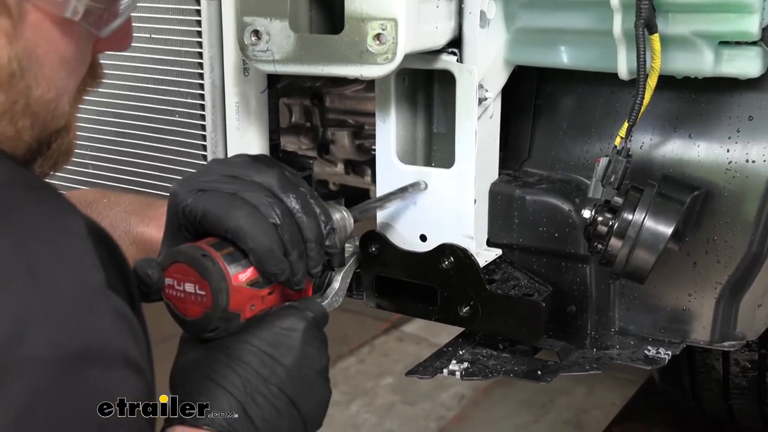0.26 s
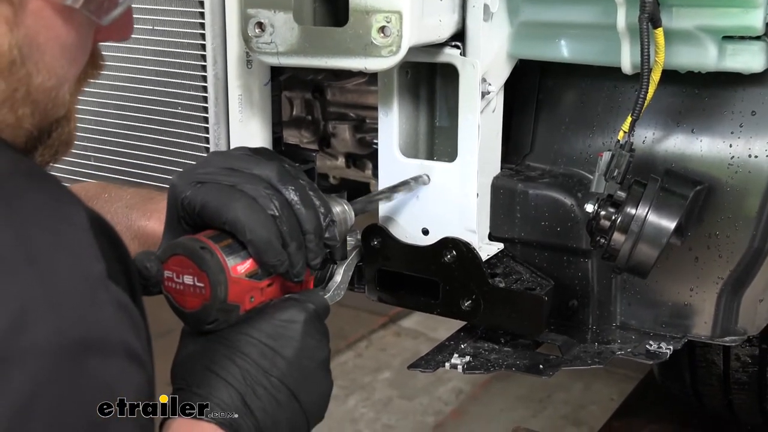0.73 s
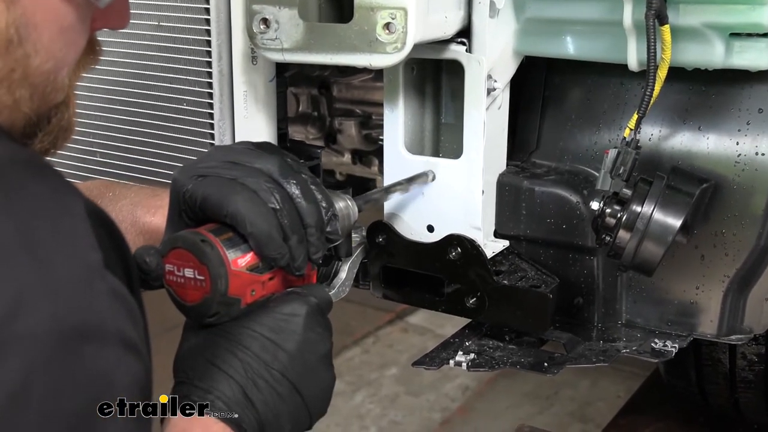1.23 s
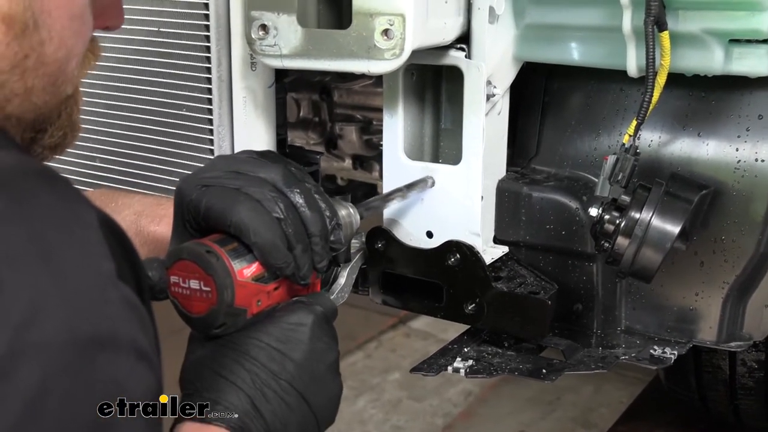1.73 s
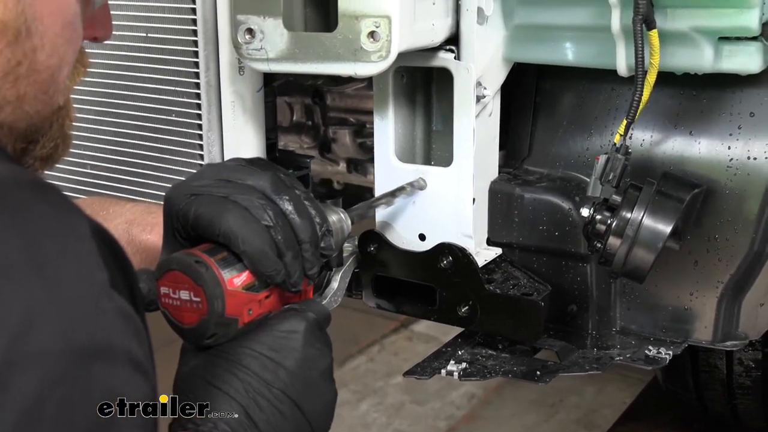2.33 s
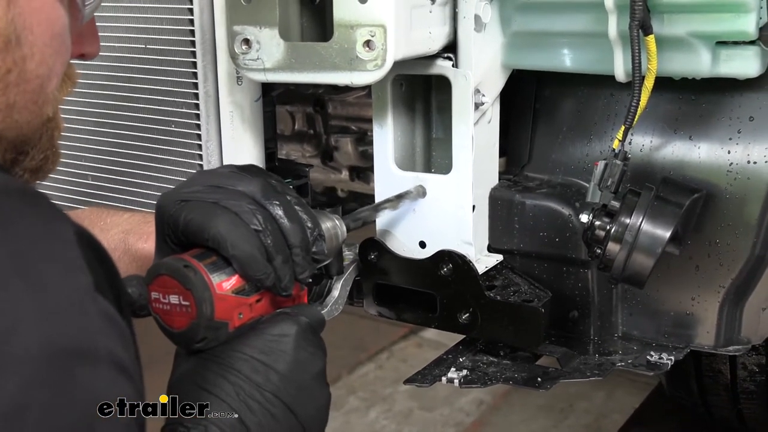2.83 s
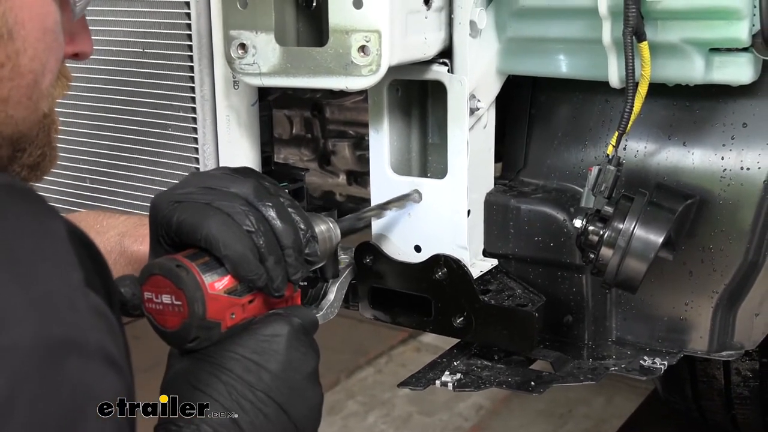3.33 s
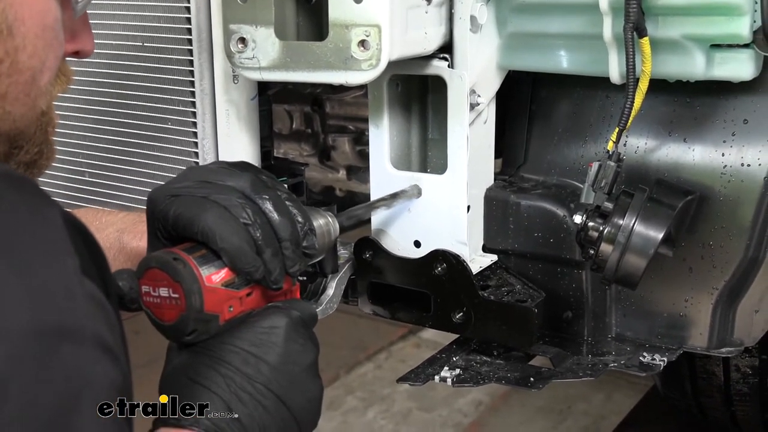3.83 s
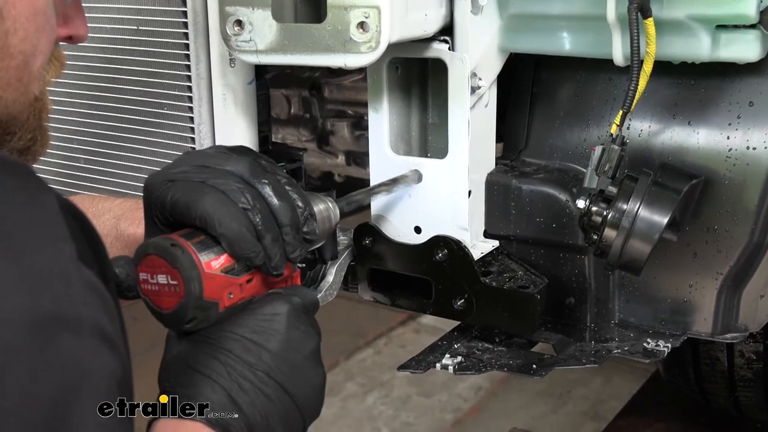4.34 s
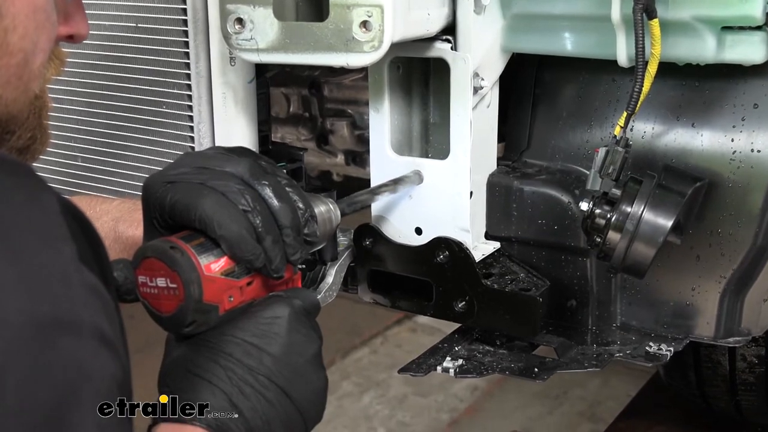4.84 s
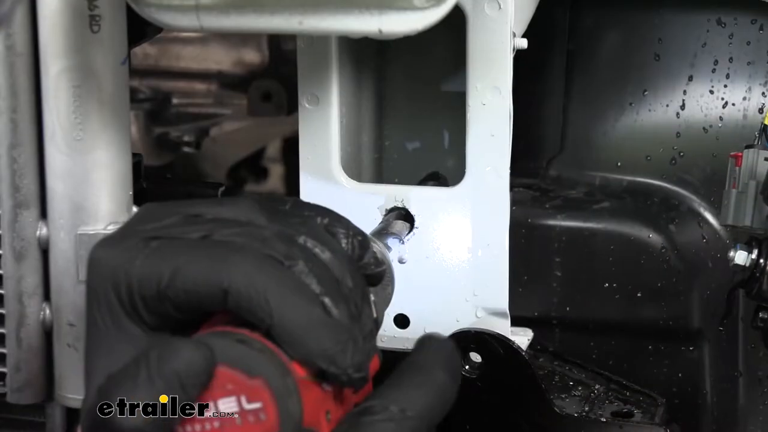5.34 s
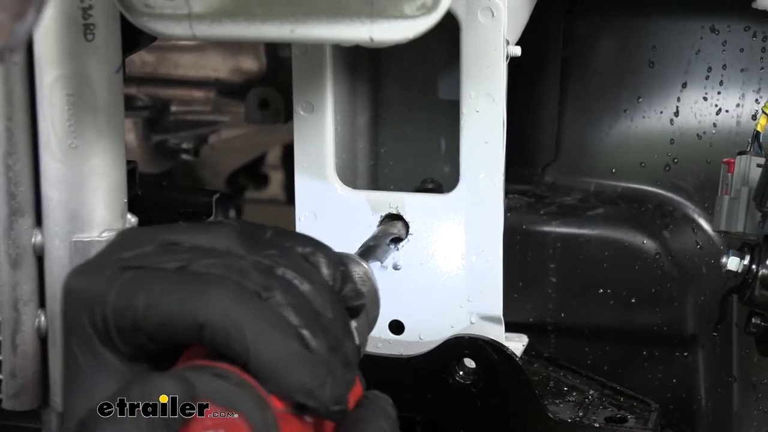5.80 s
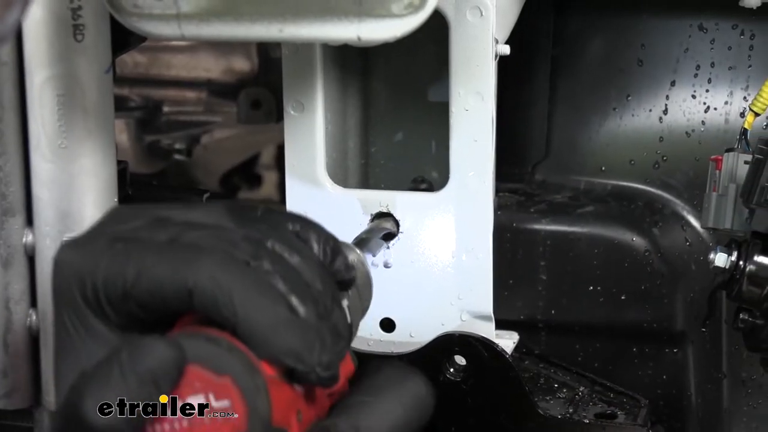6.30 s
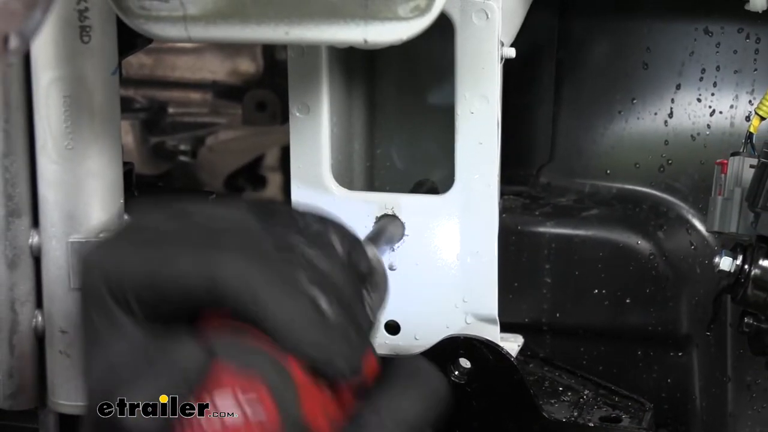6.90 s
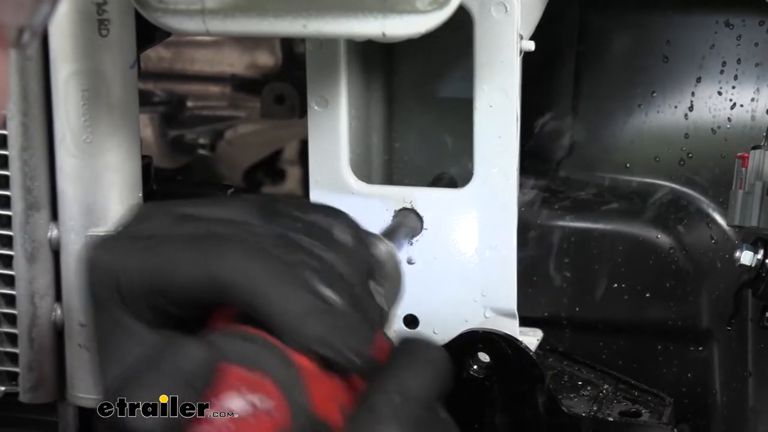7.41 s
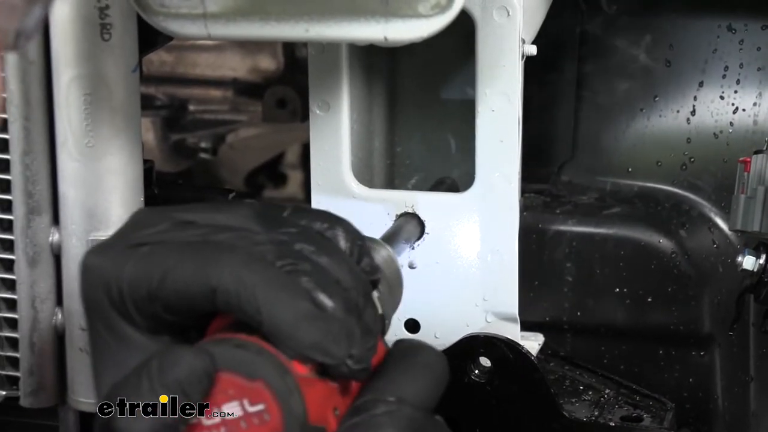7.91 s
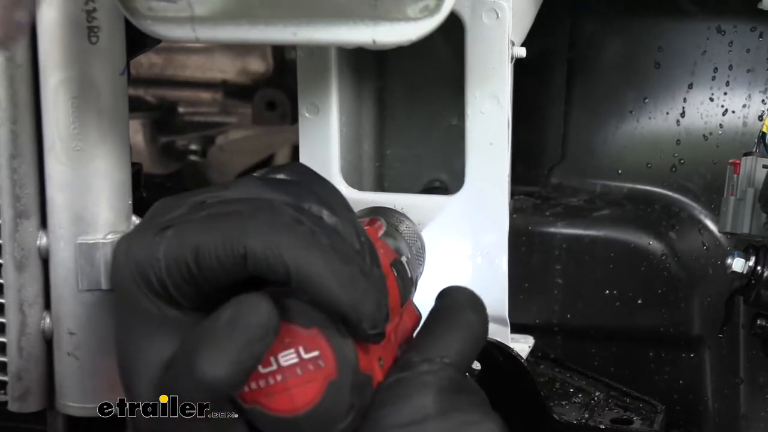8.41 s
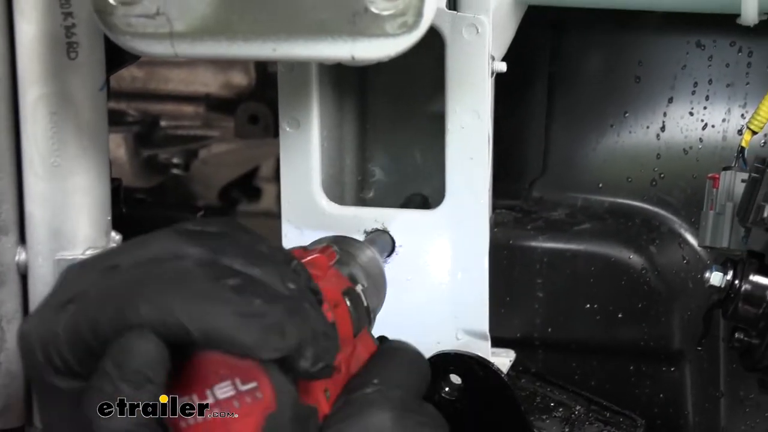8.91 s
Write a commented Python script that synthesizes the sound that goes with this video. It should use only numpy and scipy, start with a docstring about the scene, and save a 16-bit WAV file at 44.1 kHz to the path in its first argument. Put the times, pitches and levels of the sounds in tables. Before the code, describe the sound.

A cordless drill bores through steel in one long buzzing run, then scrapes and knocks in the hole in short bursts.

```python
"""A workshop, where a cordless drill bores into a steel car frame: one blip of the trigger, then a long
loaded run that speeds up as the tip breaks through. In short bursts the flutes then snag and scrape in
the open hole and ring the sheet steel. Gears buzz, the speed controller whistles, and the bit knocks
against the rim between bursts. Ventilation rumbles underneath."""
import sys
import numpy as np
from scipy import signal
from scipy.fft import rfft, irfft
from scipy.io import wavfile
from scipy.ndimage import uniform_filter1d, map_coordinates

SR = 44100
rng = np.random.default_rng(int(sys.argv[2]) if len(sys.argv) > 2 else 0)


def materialize(psi):
    """Save the field psi as 16-bit PCM at rate SR to the path in sys.argv[1].

    A 1-D psi becomes a single channel; in a 2-D psi each row is a channel.
    """
    bounded = np.clip(np.atleast_2d(psi).T, -1, 1)
    quanta = np.round(bounded * 32767).astype(np.int16)
    wavfile.write(sys.argv[1], SR, quanta)


N = 403515
T = np.arange(N) / SR
GEAR_RATIO = 19.4  # motor turns per turn of the bit
SPIN_CURVE = 1.6  # the motor starts softly, then shoots up

# trigger pulls, bit cutting: start/s, spin-up/s, hold/s, coast/s, whistle lead/s, whistle/dB, level/dB
CUTTING_PULLS = [(0.262, .072, .14, .125, 0.014, -36.5, -14), (0.7, .056, 4.52, 0.2, 0.012, -39.5, -19)]
# trigger pulls, bit loose in the hole:
# start/s, spin-up/s, hold/s, coast/s, whistle lead/s, whistle/dB, flute blows/dB, scraping/dB
LOOSE_PULLS = [(5.521, 0.045, 0.1, 0.041, 0.011, -39, -16.5, -22),
               (6.779, 0.085, .082, 0.43, 0.005, -35, -14.5, -14.5),
               (7.481, .046, 0.107, 0.034, 0.15, -44, -17.5, -17.5),
               (7.847, .064, 0.139, 0.074, 0.018, -45, -17, -19.5),
               (8.072, 0.061, 0.04, 0.012, 0.053, -60, -30, -22.5),
               (8.816, 0.05, 0.15, 0.13, 0.0075, -47, -27.5, -19.5)]


def undb(db):
    return 10 ** (np.asarray(db) / 20)


def unit(x):
    """Scale to rms 1."""
    return x / np.sqrt(np.mean(x ** 2))


def noise():
    return rng.standard_normal(N)


def walk(rate):
    """Smooth random drift of rms 1, with `rate` changes a second."""
    k = max(int(SR / rate), 2)
    return unit(uniform_filter1d(np.repeat(rng.standard_normal(N // k + 1), k), k)[:N])


def colour(x, points):
    """Minimum-phase EQ through points of f/Hz, gain/dB."""
    hz, db = np.transpose(points)
    f = np.fft.rfftfreq(4096, 1 / SR)
    cepstrum = irfft(np.log(undb(np.interp(np.log(f + 1), np.log(hz), db))))
    cepstrum[1:len(f)] *= 2
    cepstrum[len(f):] = 0
    return signal.fftconvolve(x, irfft(np.exp(rfft(cepstrum))))[:N]


def band(x, hz, width):
    """One resonance, gain 1 at its centre."""
    return signal.lfilter(*signal.iirpeak(min(hz, SR / 2 - 1), hz / width, SR), x)


def split(x, hz):
    """Crossover: lows and highs."""
    return [signal.sosfilt(signal.butter(4, hz, kind, fs=SR, output="sos"), x) for kind in ("low", "high")]


def impacts(rate, spread_db):
    """Crackle of tiny, very unequal impacts, about `rate` a second."""
    size = undb(spread_db * np.minimum(rng.exponential(size=N), 4))
    return unit((rng.random(N) < rate / SR) * size * rng.choice([-1, 1], N))


def strokes(rows, rise_s, decay_s):
    """Short noise bursts from rows of t/s, level/dB."""
    out, t = np.zeros(N), T[:SR // 10]
    envelope = (1 - np.exp(-t / rise_s)) * np.exp(-t / decay_s)
    for s, db in rows:
        i = int(s * SR)
        out[i:i + len(t)] += undb(db) * envelope * rng.standard_normal(len(t))
    return out


def swell(peak_s, half_s):
    """Bell-shaped envelope."""
    return np.exp(-((T - peak_s) / half_s) ** 2)


def cycles(hz):
    """Phase of a moving frequency, radians."""
    return 2 * np.pi * np.cumsum(hz) / SR


def ventilation():
    """A steady rumble, with a hum and a faint hiss that fade as the long run starts."""
    rumble_eq = [(22, -13.5), (110, -3.5), (164, -8), (722, -18), (2700, -31), (15500, -38.5)]  # air rumble: f/Hz, gain/dB
    early = np.interp(T, [.7, 1.0], [1, 0])
    hum = undb(-46.5) * unit(band(noise(), 155, 8))
    air = band(noise(), 1800, 270) + band(noise(), 590, 840)
    hiss = undb(-45) * unit(split(air, 4500)[0])
    return undb(-46.5) * unit(colour(noise(), rumble_eq)) + early * (hum + hiss)


def workshop(x, t60_low, t60_high, wet_db):
    """The room adds a diffuse tail; lows and highs each have their own decay."""
    t = T[:2 * SR]
    low, high = split(rng.standard_normal(len(t)), 4030)
    tail = low * undb(-60 * t / t60_low) + undb(-2) * high * undb(-60 * t / t60_high)
    tail *= 1 - np.exp(-t / .0028)
    return x + undb(wet_db) * signal.fftconvolve(x, tail / np.linalg.norm(tail))[:N]


def breakthrough(start_s=3.72, end_s=3.8):
    """0 while the lips cut under full load, 1 once the tip is through."""
    return np.interp(T, [start_s, end_s], [0, 1])


def throttle(start, rise, hold, coast, curve=1):
    """Share of full speed in one trigger pull: spin-up, hold, coast to rest."""
    slowing = np.clip(1 - (T - start - rise - hold) / coast, 0, 1) ** 1.3  # friction: fastest at first
    return np.clip((T - start) / rise, 0, 1) ** curve * slowing


def motor_speed(loose_hz=410):
    """Turns per second: set by the load while cutting, free in the open hole."""
    load_curve = [(.34, 508), (.36, 480), (.465, 485), (.75, 310), (.79, 370), (.82, 356), (.855, 386),
                  (.925, 328), (1.09, 338), (1.45, 324), (1.9, 303), (2.75, 301), (3.47, 290), (3.72, 270),
                  (3.8, 415), (3.85, 429), (3.93, 397), (4.75, 383)]  # what the cut allows: t/s, motor speed/Hz
    cutting = np.max([throttle(*row[:4], SPIN_CURVE) for row in CUTTING_PULLS], axis=0)
    loose = np.max([throttle(*row[:4], SPIN_CURVE) for row in LOOSE_PULLS], axis=0)
    allowed = np.interp(T, *np.transpose(load_curve))
    hunting = .013 * (1 - breakthrough() / 2) * walk(22)  # the uneven chip makes the speed waver
    return cutting * allowed * (1 + hunting) + loose * loose_hz


def spin_up(speed):
    """How hard the motor accelerates, 0-1."""
    return np.clip(uniform_filter1d(np.gradient(speed) * SR, SR // 100) / 3500, 0, 1)


def resonate(x, modes):
    """Resonances whose pitch wanders under full load and steadies once the tip is through."""
    ring = sum(undb(db) * band(band(x, hz, width), hz, width) for hz, width, db in modes)
    drift_s = .0004 * (1 - .75 * breakthrough()) * walk(35)
    return unit(map_coordinates(ring, [(T + drift_s) * SR]))


def controller(speed, switch_hz=9901):
    """The switching whistle, with side tones twice the motor speed above and below it."""
    spans = [(s - lead, s + rise + hold, db) for s, rise, hold, _, lead, db, _ in CUTTING_PULLS]
    # unloaded, it stops switching at full speed
    spans += [(s - lead, s + rise, db) for s, rise, _, _, lead, db, *_ in LOOSE_PULLS]
    gate = sum(undb(db) * ((T > on) & (T < off)) for on, off, db in spans)
    level = uniform_filter1d(gate * undb(1.5 * walk(40) - 4 * breakthrough()), SR // 100)
    carrier = 2 * np.pi * switch_hz * T + .2 * walk(150)
    poles = cycles(2 * speed)
    sides = undb(-3) * np.sin(carrier + poles) + undb(-7) * np.sin(carrier - poles)
    current = np.minimum(speed / 250, 1) * (1 - breakthrough() / 2)
    return np.sqrt(2) * level * (np.sin(carrier) + current * sides)


def sheet_steel(force):
    """The car frame rings on after each push; every mode is a cluster of close, beating partials."""
    modes = [(928, 3.5, 0.2), (1071, 8, 0.17), (1180, 1, 0.16), (1290, -1.5, 0.51), (1419, 8.5, 0.056),
             (1510, -2, 0.12), (1790, 3, 0.23), (2185, 7.5, 0.25)]  # modes of the frame: f/Hz, level/dB, t60/s
    t, ring = T[:SR], 0
    for hz, db, t60 in modes:
        detune, angle = rng.standard_normal((2, 10, 1))
        partials = np.sin(2 * np.pi * (hz * (1 + .03 * detune) * t + angle))
        ring = ring + undb(db - 60 * t / t60) * partials.sum(axis=0)
    return signal.fftconvolve(force, ring / np.linalg.norm(ring))[:N]


def squeaks():
    """A land of the bit sticks and slips on the rim in brief, unsteady tones."""
    slips = [(6.238, .004, 1650, -30), (7.177, .005, 1705, -10.5), (8.894, .008, 1870, -14)]  # stick-slip tones: t/s, half length/s, f/Hz, level/dB
    return sum(undb(db) * swell(s, half) * np.sqrt(2) * np.sin(cycles(hz * (1 + .0314 * walk(500))))
               for s, half, hz, db in slips)


def rocking():
    """The tilted bit drags on the rim and makes the sheet groan."""
    drags = [(5.645, 0.027, -17.5), (5.7, 0.03, -23.5), (5.99, 0.036, -50), (6.395, 0.013, -47),
             (6.67, 0.015, -20.5), (6.811, 0.0093, -17.5), (6.95, 0.03, -18.5), (8.24, 0.019, -34),
             (8.754, 0.03, -34), (8.94, 0.043, -17.5)]  # drags on the rim: t/s, half length/s, level/dB
    pressure = sum(undb(db) * swell(s, half) for s, half, db in drags)
    rub = band(band(impacts(900, 2.2) * pressure, 1150, 860), 1170, 1450)
    return undb(12) * rub + sheet_steel(rub)


def knocks():
    """The bit hits the rim: a low thud, a dull body that rings the sheet, and a bright edge."""
    hits = [(5.48, -25, -13, -39), (6.234, -25, -15, -38), (6.63, -19, -4, -34), (6.701, -14, -4, -25),
            (6.796, -13, -11, -22), (6.857, -2, 3, -18), (6.995, -5, -6, -4.5), (7.08, -6, -3, -11),
            (7.539, -5, -1, -6.5), (7.955, -3, 2, -16), (8.275, -14, -1.5, -23), (8.721, -40, -19, -46),
            (8.759, -11, 3, -17.5), (8.823, -20, -17, -27), (8.887, -2, 6.5, -30)]  # knocks on the rim: t/s, thud/dB, body/dB, edge/dB
    chatter = [(8.913 + k * .0161, 2) for k in range(5)]  # the flutes hop round the rim: t/s, level/dB
    thud = strokes([(s, db) for s, db, _, _ in hits], .00096, .0053)
    body = strokes([(s, db) for s, _, db, _ in hits] + chatter, .0017, .003)
    edge = strokes([(s, db) for s, _, _, db in hits], .0012, .0066)
    low = split(thud, 630)[0]
    dull = band(band(body, 1630, 1500), 970, 1900)
    bright = band(edge, 4200, 1900)
    return undb(5.5) * low + undb(4) * dull + undb(-20) * sheet_steel(dull) + undb(8) * bright


def chips():
    """Swarf snaps off with a dry tick."""
    snaps = [(0.1645, -41), (5.468, -19), (5.6655, -13.5), (5.7488, -28), (5.989, -45), (6.086, -39),
             (6.498, -45.5), (6.512, -36), (6.943, -13), (6.9947, -7), (7.016, -14), (7.0309, -10),
             (7.081, -7), (7.113, -12.5)]  # snapping swarf: t/s, level/dB
    return undb(5) * band(strokes(snaps, rise_s=.00046, decay_s=.0015), 8500, 9750)


def reaming():
    """Flutes hail on the rim, lands scrape, swarf rattles; a binding screech is returned separately."""
    scrape_eq = [(30, -20.5), (162, -9), (317, -9.5), (606, 0.5), (778, -6.5), (1410, -1.5), (1960, -6.5),
                 (3500, -6), (6500, -12.5), (9000, -21.5), (15500, -22.5)]  # steel on steel: f/Hz, gain/dB
    bit_modes = [(3860, 2000, 9), (14500, 1700, -2)]  # ring of the binding bit: f/Hz, width/Hz, level/dB
    flute_modes = [(4820, 200, 1), (5720, 230, -0.5), (10800, 540, -10), (14000, 1500, -16)]  # ring of the flutes and their swarf: f/Hz, width/Hz, level/dB
    blow_gain = scrape_gain = 0
    for start, rise, hold, coast, _, _, blows_db, scrape_db in LOOSE_PULLS:
        drive = throttle(start, rise, hold, coast, SPIN_CURVE) ** .8  # loudness follows the motor
        blow_gain += undb(blows_db) * drive
        scrape_gain += undb(scrape_db) * drive
    hail = impacts(1400, 2.6) * undb(2.8 * walk(160))
    blows = unit(split(colour(hail, scrape_eq), 1600)[0])
    grit = impacts(6000, 2.5) * undb(2 * walk(220))
    scrape = unit(split(colour(grit, scrape_eq), 1300)[1])
    screech = undb(5.5) * resonate(grit, bit_modes) * swell(peak_s=5.61, half_s=.14)  # binds once
    rattle = undb(-9) * resonate(impacts(500, 4), flute_modes)
    contact = blows * blow_gain + (scrape + rattle) * scrape_gain
    return undb(-2.5) * contact + undb(-21) * sheet_steel(contact), screech * scrape_gain


def whirr(speed):
    """The gear train buzzes as the motor takes it up to speed."""
    buzz = band(band(impacts(2000, 2.2), 3430, 900), 3800, 5000)
    return undb(-29.5) * unit(buzz) * spin_up(speed)


def revs(sweep_s=.04, smear=.02):
    """The gear whine sweeps up as the motor races, and breaks off when the flutes catch."""
    # motor surges: top/s, top speed/Hz, catch/s, tone at 8 x speed/dB, tone at 16 x speed/dB
    surges = [(.34, 505, .35, -13, -22), (5.598, 530, 5.596, -20, -38), (6.892, 435, 6.897, -19, -34),
              (7.545, 330, 7.536, -28, -18), (7.916, 452, 7.926, -19, -36), (8.112, 488, 8.114, -25, -42),
              (8.9, 440, 8.889, -19, -26)]
    out = 0
    for top_s, top_speed, catch_s, low_db, high_db in surges:
        share = np.exp(-np.minimum(((T - top_s) / sweep_s) ** 2, 20))
        shaft = cycles(top_speed * share * (1 + smear * walk(500)))
        whine = undb(low_db) * np.sin(8 * shaft) + undb(high_db) * np.sin(16 * shaft)
        running = np.clip((catch_s - T) / .004 + .5, 0, 1)
        out += share ** 2.5 * running * whine
    return np.sqrt(2) * out


def catches(attack_s=.0025, smear=.06):
    """The cutting lip catches: a rough squeal that swells and dies within milliseconds."""
    squeals = [(.944, -9, 3630), (2.262, -11, 3150), (2.3263, -8, 3460), (2.855, -13, 3300),
               (3.5206, -8.5, 3380), (3.9298, -8.5, 3460), (4.331, -8, 3660), (4.5084, -8, 3420),
               (4.709, -9, 3690), (4.8396, -9, 3710), (5.017, -8, 3490)]  # catches of the lip: t/s, level/dB, f/Hz
    out = 0
    for s, db, hz in squeals:
        age = np.clip((T - s) / attack_s, 0, 20)
        tone = np.sin(cycles(hz * (1 + smear * walk(900))))
        out += undb(db - 3.5) * age * np.exp(1 - age) * tone
    return out


def gears(speed):
    """Meshing teeth sing, smeared by backlash; they stand out when the motor races or sags."""
    # gear tones: multiple of motor speed, loaded/dB, light load/dB, racing/dB
    mesh = [(4, -15, -18, -17), (8, -15.5, -14, -7), (13.75, -17, -18.5, -26), (16, -15.5, -16, -9.5),
            (28, -22, -34, -34)]
    free = breakthrough()
    racing = np.interp(speed, [430, 470], [0, 1])
    backlash = (.012 + .003 * free) * (1 - racing / 2)
    wobble = .016 * (1 - free) * np.sin(cycles(speed / GEAR_RATIO))  # the lips brake once per bit turn
    shaft = cycles(speed * (1 + wobble + .006 * walk(60) + backlash * walk(600)))
    strain_db = (1 - free) * np.interp(speed, [120, 270, 300, 355, 385, 470], [-13, 4, -1, -3, 7, 0])
    rising_db = spin_up(speed) * (15 * np.sqrt(free) - 7)  # soft from rest, loud as the load lets go
    tones = 0
    for multiple, loaded_db, light_db, racing_db in mesh:
        db = (loaded_db + free * (light_db - loaded_db)) * (1 - racing) + racing * racing_db
        flicker = undb(3 * walk(200) + 2 * walk(25))
        tones += undb(db) * unit(np.sin(multiple * shaft) * flicker)
    return undb(strain_db + rising_db) * tones


def shudder(speed):
    """The bit shudders at low harmonics of the spindle."""
    harmonics = [(3, -25, -27), (7, -28, -23.5), (11, -30, -27)]  # shudder tones: multiple of spindle speed, loaded/dB, light load/dB
    free, spindle = breakthrough(), cycles(speed / GEAR_RATIO)
    tones = 0
    for multiple, loaded_db, light_db in harmonics:
        phase = multiple * spindle + .35 * walk(8) + rng.uniform(0, 2 * np.pi)
        tones += undb(loaded_db + free * (light_db - loaded_db)) * unit(np.sin(phase))
    return tones * np.minimum(speed / 300, 1)


def feed(bite_db=5.5, bite_s=.2, ease_db_per_s=.16):
    """Force of the cut: it follows the trigger, bites hard at the start of each pull and slowly eases."""
    force = 0
    for start, rise, hold, coast, _, _, db in CUTTING_PULLS:
        age = np.maximum(T - start, 0)
        push = undb(db + bite_db * np.exp(-age / bite_s) - ease_db_per_s * age)
        force += push * throttle(start, rise, hold, coast) ** .95
    return force


def boring(speed):
    """The lips tear chips in time with the spindle; as the load eases, the gearbox rattle comes up."""
    cut_eq = [(35, -13), (60, -11.5), (135, -3.5), (359, -5), (585, -2), (1380, -3), (1550, 4),
              (1960, -7.5), (2650, -9), (3700, -1.5), (5450, -8.5), (10200, -12), (13000, -19),
              (15500, -22)]  # tearing steel: f/Hz, gain/dB
    housing_modes = [(1580, 125, 2), (3203, 310, 5.5), (3646, 205, 8.5), (5970, 310, -9.5), (7960, 450, -1),
                     (14700, 950, -16)]  # gearbox resonances: f/Hz, width/Hz, level/dB
    free, spindle = breakthrough(), cycles(speed / GEAR_RATIO)
    bite = undb(np.sin(spindle) + np.sin(6 * spindle) + walk(150))
    cut = unit(colour(impacts(9000, 2.22) * bite, cut_eq))
    teeth = impacts(3500, 1.6) * bite * undb(3.8 * walk(230))  # slack gears clatter in clumps
    rattle = resonate(teeth, housing_modes)
    return undb(-2.06 - 1.63 * free) * cut + undb(-8 + 3.4 * free) * rattle


def scene():
    """Mono mix: the drill with a short tail, the rim with a longer one, whistle and ventilation dry."""
    speed = motor_speed()
    cutting = (boring(speed) + shudder(speed) + gears(speed)) * feed()
    drill = cutting + catches() + revs() + whirr(speed)
    rubbing, screech = reaming()
    rim = rubbing + knocks() + chips() + rocking() + squeaks()
    mono = workshop(drill + screech, t60_low=.41, t60_high=.32, wet_db=-14.5)
    mono += workshop(rim, t60_low=.93, t60_high=.95, wet_db=-13.5)
    mono += controller(speed) + ventilation()
    return np.array([mono, mono])


def record(dry, ceiling=.85, top_hz=15800):
    """The loudest peaks are rounded and the top is cut."""
    rounded = dry / (1 + (dry / ceiling) ** 4) ** (1 / 4)
    return signal.sosfilt(signal.ellip(10, .2, 80, top_hz, fs=SR, output="sos"), rounded)


dry = scene()
out = record(dry)
materialize(out)
```